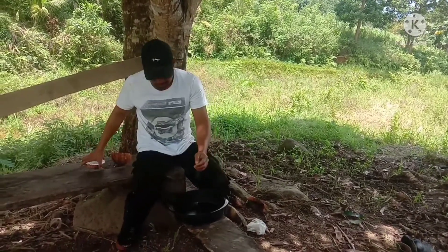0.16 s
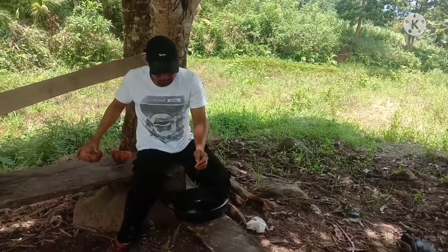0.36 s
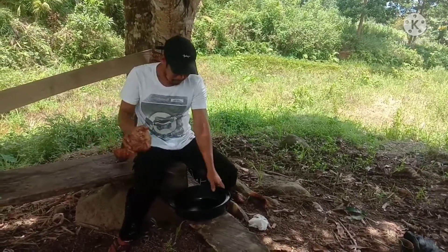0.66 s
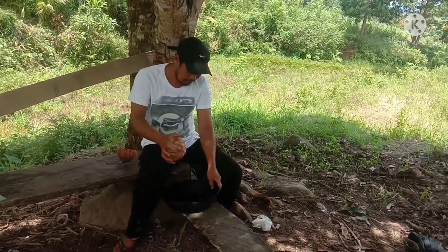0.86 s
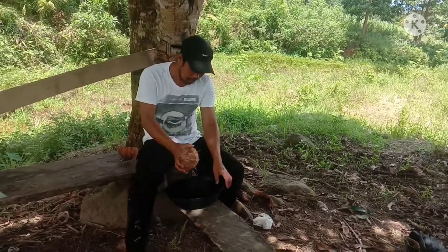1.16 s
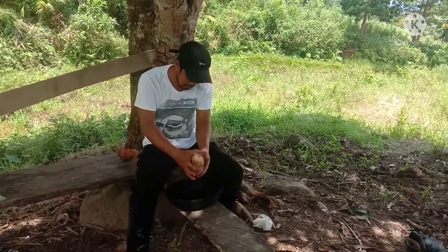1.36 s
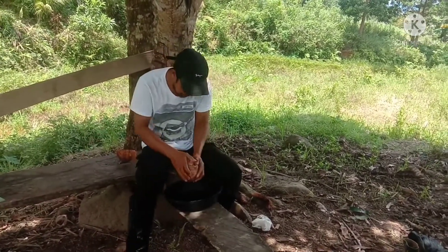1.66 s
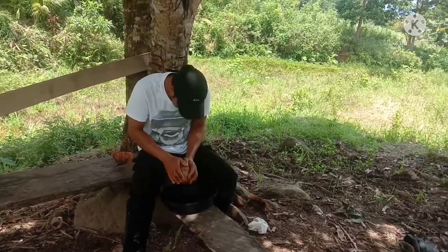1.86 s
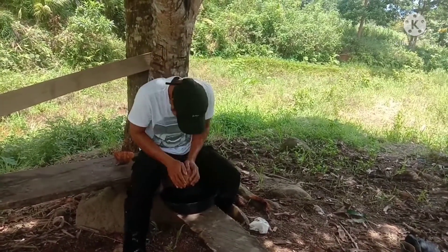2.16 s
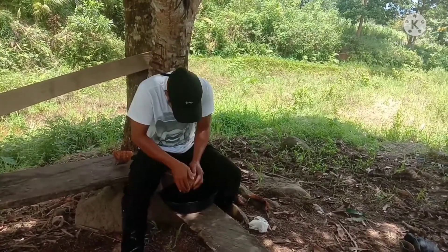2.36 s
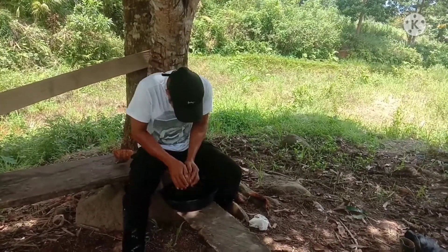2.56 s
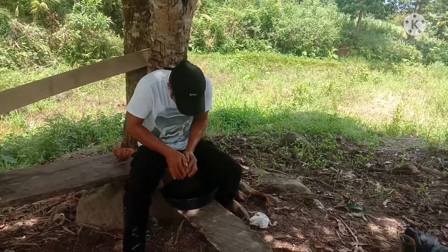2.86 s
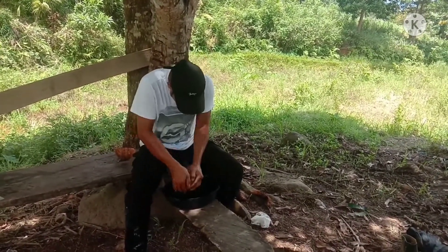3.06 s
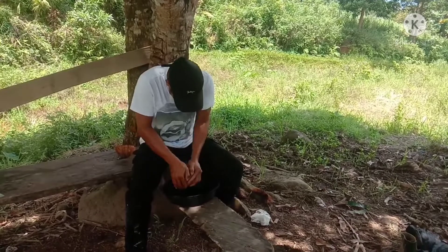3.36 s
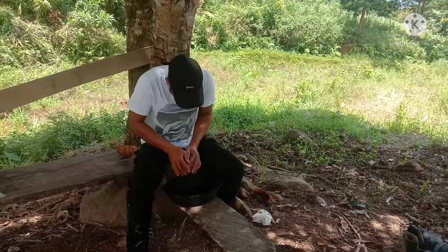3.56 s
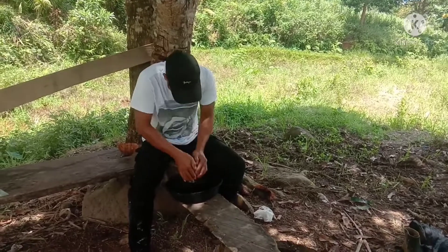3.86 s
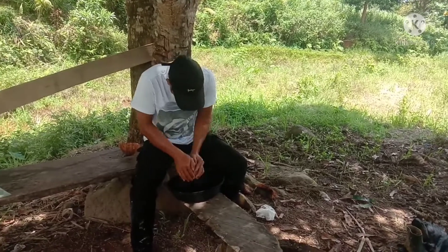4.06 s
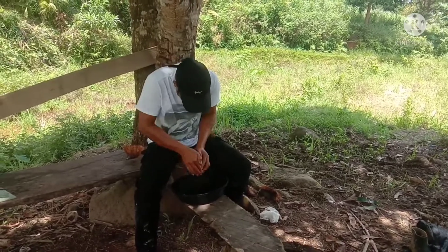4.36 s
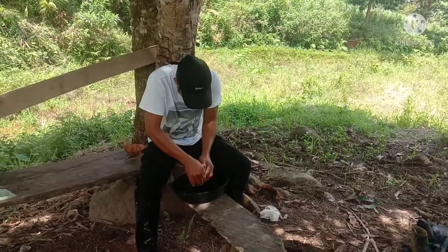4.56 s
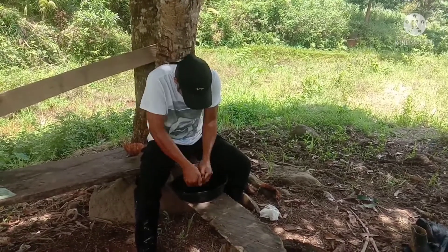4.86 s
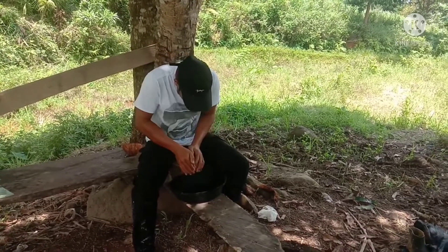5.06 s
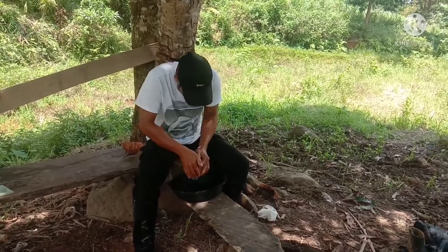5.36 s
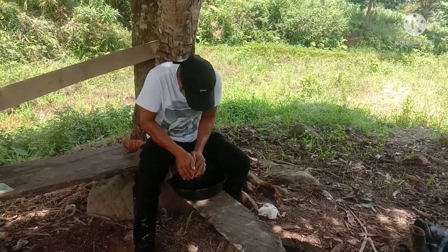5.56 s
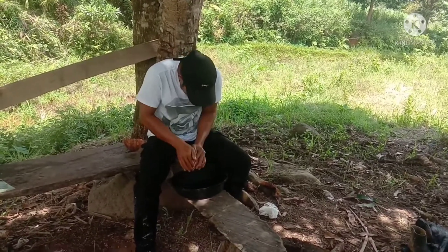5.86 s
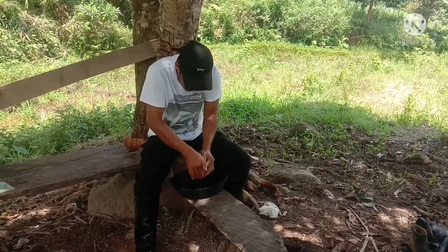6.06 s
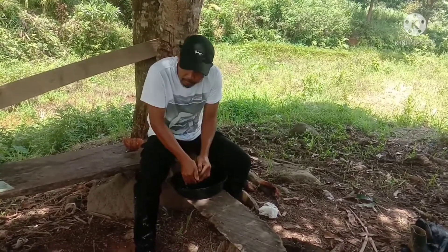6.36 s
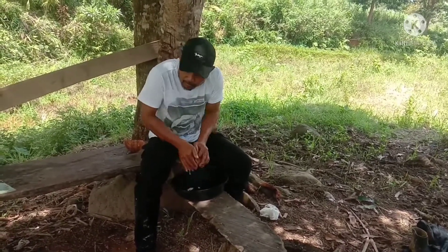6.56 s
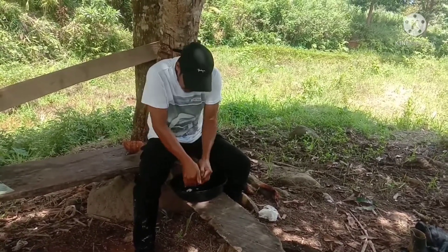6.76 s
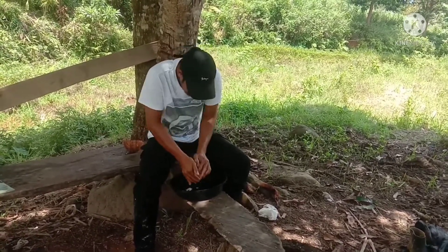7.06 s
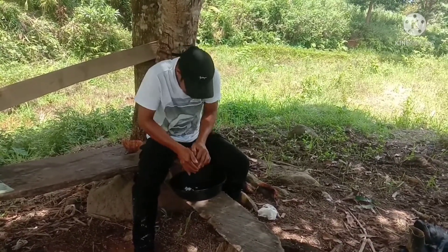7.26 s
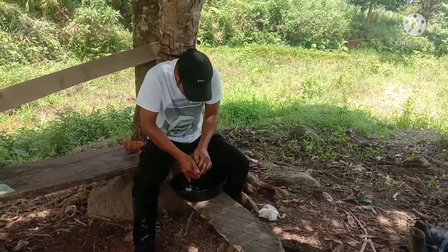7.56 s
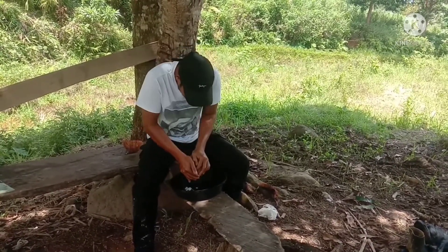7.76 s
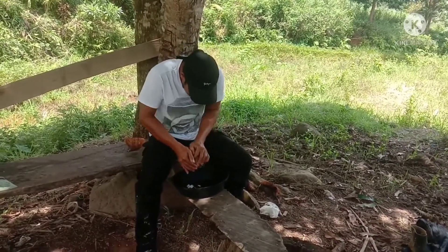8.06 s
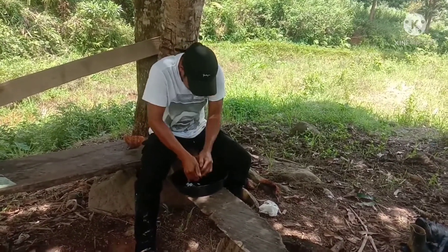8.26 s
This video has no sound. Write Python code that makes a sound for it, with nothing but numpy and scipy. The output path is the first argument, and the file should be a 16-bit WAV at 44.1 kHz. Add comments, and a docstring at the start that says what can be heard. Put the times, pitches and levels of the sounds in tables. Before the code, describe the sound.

Light hollow knocks and a faint scuff come first, followed by about a second of just insects, breeze and faint bird whistles. Then coarse, crunchy scraping begins and continues to the end: brief gritty strokes with tiny gaps, dull bench thumps and shell clacks mixed in, and a slight steel ring. Open-air setting, dry with a little reflection, thin sound from a small microphone.

```python
"""On a wooden bench under a tree, a coconut half is rasped in quick strokes over a toothed steel blade.
Random clicks, as of teeth catching the flesh, ring the shell, bench and blade and make the rasp.
Short pushes ring the shell and bench again as knocks when the shell lands or bumps.
Cicadas drone as coloured clicks in several bands, far birds whistle as gliding sine tones,
and patchy noise makes the background: a light breeze and faint insect lines."""
import sys
import numpy as np
from scipy import signal
from scipy.fft import rfft, irfft, next_fast_len
from scipy.io import wavfile
from scipy.ndimage import uniform_filter1d

SR = 44100
rng = np.random.default_rng(int(sys.argv[2]) if len(sys.argv) > 2 else 0)


def unload_wav(signal):
    """Save mono or channel-first audio to the path in sys.argv[1] as 16-bit WAV at rate SR, clipped to [-1, 1]."""
    wavfile.write(
        sys.argv[1],
        SR,
        np.round(np.clip(np.atleast_2d(signal).T, -1, 1) * 32767).astype(np.int16),
    )


N = 370881

# ringing tones of the wooden bench: f/Hz, width/Hz (wider dies faster), relative level/dB
BENCH_TONES = [(127, 33, -7.5), (216.3, 41, -0.5), (360.8, 38, 2), (457.6, 30.4, 2.5), (529, 52, 1)]
# ringing tones of the coconut shell: f/Hz, width/Hz, relative level/dB
SHELL_TONES = [(838, 290, -6.5), (1023, 83, -6.5), (1146, 40, -8), (1255, 46, -7), (1438, 99, 0),
               (1628, 113, -2.5), (2090, 170, -9)]
# tone colour of the rasp as the microphone hears it, with its dip at 10-13 kHz and peak near 15.5 kHz:
# f/Hz, relative level per Hz/dB
RASP_COLOUR = [(1060, -73), (1800, -9.5), (2280, -3.5), (2540, -2), (2780, -3.5), (3300, -3), (4320, -7.5),
               (6210, -0.5), (6670, -6), (7440, -3.5), (8140, -17.5), (9840, -29.5), (13000, -33),
               (14800, -25), (15600, -12)]


def undb(db):
    """Turn decibels into a factor to multiply the sound by."""
    return 10 ** (np.asarray(db) / 20)


def unit(x):
    """Scale a sound to an average strength (rms) of 1."""
    return x / np.sqrt(np.mean(x ** 2))


def along(s, values):
    """Join points in time (s) by straight lines, read at every sample."""
    return np.interp(np.arange(N) / SR, s, values)


def colour(x, spectrum):
    """Shape a sound by (Hz, dB) points, with steep slopes outside them, and scale it to rms 1."""
    size = next_fast_len(N)
    hz, db = np.transpose(spectrum)
    log_hz = np.log(np.arange(size // 2 + 1) * SR / size + 1)  # 1 Hz added to avoid log(0)
    below = np.maximum(np.log(hz[0]) - log_hz, 0)
    above = np.maximum(log_hz - np.log(hz[-1]), 0)
    curve_db = np.interp(log_hz, np.log(hz), db) - 60 * (below + above)
    return unit(irfft(rfft(x, size) * undb(curve_db), size)[:N])


def walk(rate):
    """Random wandering: levels held 1 / rate seconds, then smoothed twice; typical spread a little under 1."""
    k = int(SR / rate)
    steps = np.repeat(rng.standard_normal(N // k + 1), k)
    return 1.15 * uniform_filter1d(uniform_filter1d(steps, k), k)[:N]


def ring(x, modes, shift_db=0):
    """Let x strike tones that die away; a moving contact favours now one tone, now another."""
    out = 0
    for k, (hz, width, db) in enumerate(modes):
        r = np.exp(-np.pi * width / SR)  # how much is left after one sample
        w = 2 * np.pi * hz / SR
        strike = x * undb(shift_db * walk(14))
        tone = signal.lfilter([0, np.sin(w)], [1, -2 * r * np.cos(w), r * r], strike)
        # neighbouring tones swing in opposite directions
        out = out + (-1) ** k * undb(db) * np.sqrt(width) * tone
    return out


def clicks(rate, spread_db):
    """Random clicks up and down, about rate per second, a few much larger than the rest; rms 1."""
    when, sign, size = rng.random(N), rng.standard_normal(N), rng.exponential(size=N)
    return unit((when < rate / SR) * np.sign(sign) * undb(spread_db * size))


def grating():
    """Teeth catch and tear: slow catches shake bench and shell, fine tearing rasps on top."""
    # ringing tones of the steel blade: f/Hz, width/Hz, relative level/dB
    blade_tones = [(2054, 33, 4.5), (2350, 220, 3), (3290, 23, -0.5), (4584, 37, -9.5), (5676, 60, 12),
                   (6030, 320, 3), (7360, 117, -20)]
    shell, bench, rasp = np.zeros((3, N))
    for s, *levels in rubs():
        gate = along([s[0] + .004, s[0] + .022, s[-1], s[-1] + .03], [0, 1, 1, 0])
        # the arm speeds up and slows down smoothly, which rounds the top of each stroke
        shell_db, bench_db, rasp_db = [uniform_filter1d(along(s, db), int(0.057 * SR)) for db in levels]
        shell += gate * undb(shell_db)
        bench += gate * undb(bench_db)
        rasp += gate * undb(rasp_db)
    judder = walk(90)  # the grip on the teeth comes and goes
    catches = clicks(700, 2.2) * undb(1.8 * judder)
    tearing = clicks(5000, 2.0) * undb(1.3 * judder)
    # dividing by the strength of steady ringing lets the stroke levels set the loudness
    bench_gain, shell_gain = (np.std(ring(catches, m)) for m in (BENCH_TONES, SHELL_TONES))
    bench_ring = ring(catches * bench, BENCH_TONES, 1.9) / bench_gain
    shell_ring = ring(catches * shell, SHELL_TONES, 3.4) / shell_gain
    # the steel sings on its own tones
    blade_ring = unit(ring(tearing, blade_tones, 2.7))
    blade = colour(tearing, RASP_COLOUR) + undb(-9.0) * blade_ring
    return undb(-0.12) * (bench_ring + shell_ring) + undb(3.0) * rasp * blade


def rubs():
    """Each rub as start, top and end times, with shell, bench and rasp levels that follow the arm's speed."""
    # grating strokes: landing t/s, time to full speed/s, slowing-down time/s, then relative levels:
    # shell ring at full speed/dB, bench ring at landing/dB, rasp at full speed/dB
    strokes = [(2.188, 0.089, 0.091, -31.5, -36.5, -36), (2.572, 0.053, 0.15, -28.5, -39, -34),
               (2.932, 0.085, 0.13, -31, -34.5, -36.5), (3.302, 0.078, 0.11, -28.5, -37.5, -35),
               (3.653, 0.1, 0.11, -30, -30.5, -35), (4.029, 0.094, 0.11, -30.5, -33.5, -34),
               (4.418, 0.058, 0.13, -29, -27, -34.5), (4.782, 0.071, 0.12, -27, -32, -35.5),
               (5.13, 0.094, 0.12, -34.5, -35.5, -36), (5.499, 0.1, 0.12, -32.5, -30.5, -36.5),
               (5.87, 0.11, 0.093, -34.5, -24, -36), (6.278, 0.067, 0.15, -30, -34, -36.5),
               (6.629, 0.13, 0.094, -37.5, -40.5, -38.5), (7.016, 0.075, 0.13, -29, -29.5, -35.5),
               (7.371, 0.09, 0.11, -31.5, -30, -35.5), (7.723, 0.081, 0.11, -29.5, -33, -34.5),
               (8.073, 0.089, 0.12, -33, -33, -34.5)]
    # the shell is picked up, turned or shifted: t/s, fade time/s,
    # then relative levels: shell ring/dB, bench ring/dB, rasp/dB
    handling = [(.72, 0.059, -45.5, -62, -68), (.8, 0.059, -44, -56, -51), (.865, 0.12, -42, -45.5, -47.5),
                (1.124, 0.048, -53.5, -68, -55), (1.922, 0.05, -55, -54.5, -49),
                (8.278, 0.027, -48, -37.5, -42.5)]
    shell_rise_db, rasp_rise_db = 9, 12.5  # gained between landing and full speed
    bench_under_shell_db = 9.5  # at full speed
    shell_fall_db, bench_fall_db, rasp_fall_db = 39, 32, 23  # lost while the arm slows down
    handling_rise_s, handling_rise_db, handling_fall_db = .03, 6, 21
    for s, rise_s, fall_s, shell_db, bench_db, rasp_db in strokes:
        held_db = shell_db - bench_under_shell_db
        yield ([s, s + rise_s, s + rise_s + fall_s],
               [shell_db - shell_rise_db, shell_db, shell_db - shell_fall_db],
               [bench_db, held_db, held_db - bench_fall_db],
               [rasp_db - rasp_rise_db, rasp_db, rasp_db - rasp_fall_db])
    for s, fade_s, *levels in handling:
        yield ([s - handling_rise_s, s, s + fade_s],
               *([db - handling_rise_db, db, db - handling_fall_db] for db in levels))


def knocks():
    """Each bump is a short push into the bench, a sharper one into the shell, and a small crack."""
    # the shell lands, bounces or bumps: t/s, relative level/dB, hardness (extra for shell and crack)/dB
    bumps = [(0.681, -47, 10.5), (0.718, -42.5, 15), (0.775, -27, 6), (0.834, -23, 8), (1.046, -56, 14),
             (1.104, -27, -7.5), (2.189, -34, 3.5), (2.209, -41, -19), (2.574, -25, 7.5), (2.61, -22, -16),
             (2.696, -11.5, -13.5), (2.934, -15.5, 0), (3.019, -24, -10), (3.303, -31, 2.5),
             (3.347, -19, -20), (3.655, -13, 1), (3.676, -18.5, 3), (3.595, -43, -7), (3.974, -37, -8),
             (4.029, -21.5, 3.5), (4.049, -10, -3), (4.095, -23, -8), (4.421, -13, -10), (4.441, -22, -20),
             (4.786, -15, -1), (4.809, -14.5, -4), (4.839, -20, -2), (4.874, -33, -3), (4.908, -13.5, -28),
             (5.071, -38, -13), (5.132, -19.5, -1.5), (5.268, -11.5, -10.5), (5.512, -23, -25),
             (5.871, -14, -5.5), (6.22, -46.5, 9), (6.265, -30, 5), (6.282, -14, -2.5), (6.3, -15, -11),
             (6.315, -19.5, -6), (6.63, -20, -2.5), (6.649, -27, -2), (6.667, -20, -1.5),
             (6.741, -25.5, 3.5), (7.016, -22.5, -3), (7.024, -26, 0), (7.371, -25, 5.5),
             (7.725, -18.5, -3), (8.075, -12, -6), (8.091, -15, -2), (8.212, -14, -7.5), (8.258, -26, -2),
             (8.272, -26, -4), (8.33, -49, 9)]
    soft, hard = np.zeros((2, N))
    for s, db, hard_db in bumps:
        i = int((s + .003) * SR)  # the blow comes 3 ms after the listed time
        soft[i] += undb(db)
        hard[i] += undb(db + hard_db)
    push = signal.windows.hann(int(0.0014 * SR))
    tap = signal.windows.hann(int(.0004 * SR))
    crack_fade = signal.lfilter([1], [1, -np.exp(-1 / (0.0041 * SR))], hard)
    crack_colour = [p for p in RASP_COLOUR if p[0] < 9000]
    crack = crack_fade * colour(rng.standard_normal(N), crack_colour)
    bench = ring(np.convolve(soft, push / push.sum())[:N], BENCH_TONES, 1.4)
    # the hairy shell meets several teeth within a few milliseconds
    chatter_shape = np.convolve(hard, signal.windows.hann(int(0.0051 * SR)))[:N]
    chatter = chatter_shape * clicks(2500, .8)
    blows = undb(-5.5) * hard + undb(-27.0) * chatter
    shell = ring(np.convolve(blows, tap / tap.sum())[:N], SHELL_TONES, 1.8)
    return undb(-31) * bench + undb(-23.5) * shell + undb(-18) * crack


def cicadas():
    """Many drum-like skins click out of step; each chorus flutters on its own, near singers swell later."""
    # loudness over time: t/s, then relative levels: low chorus/dB, high chorus/dB, near singers/dB
    chorus = [(0.0, -48, -58.5, -56), (0.65, -48, -58, -52.5), (1.4, -48.5, -59.5, -55),
              (2.9, -47.5, -57.5, -53), (3.49, -46, -56, -44.5), (5.29, -47.5, -57, -43.5),
              (6.39, -46.5, -56.5, -44.5), (7.45, -49, -58.5, -46.5), (8.41, -48.5, -58, -51.5)]
    # tone colour of the low chorus: f/Hz, relative level per Hz/dB
    low_colour = [(2900, -44), (3090, -1), (3490, 3), (4000, 6.5), (4400, -2), (4770, -34)]
    # tone colour of the high chorus: f/Hz, relative level per Hz/dB
    high_colour = [(4700, 1), (4900, -10), (5290, 4), (5500, 1.5), (5780, -5), (6300, -11), (6620, -24.5),
                   (6980, 1.5), (7500, -6.5), (8500, -2.5), (9300, -12.5), (9900, -73)]
    # ringing tones of the near singers: f/Hz, width/Hz, relative level/dB
    singer_tones = [(5826, 160, -2.5), (6080, 44, -5), (6330, 55, -5.5), (7020, 190, -6.5)]
    s, low_db, high_db, near_db = np.transpose(chorus)
    low_level = undb(along(s, low_db) + 0.96 * walk(6) + 0.71 * walk(50))
    low = colour(clicks(1500, 0.37), low_colour) * low_level
    high_level = undb(along(s, high_db) + 1.4 * walk(5.4) + 1.24 * walk(40))
    high = colour(clicks(4000, 0.37), high_colour) * high_level
    near_level = undb(along(s, near_db) + 0.3 * walk(5.1))
    near = unit(ring(clicks(2500, 0.85), singer_tones)) * near_level
    return undb(-2.5) * low + undb(3.0) * high + undb(-4.5) * near


def birds():
    """Far whistles as gliding, fading sine tones, the rough ones wavering in pitch and level."""
    # one whistle a row: start t/s, end t/s, first f/Hz, last f/Hz (both before wavering),
    # relative level/dB, roughness (0 is a clean whistle)
    whistles = [(0.058, 0.135, 2550, 2680, -63, 0.5), (0.248, 0.307, 2020, 1926, -58, 0.5),
                (0.297, 0.485, 2490, 2504, -62, 0.55), (0.493, 0.695, 2656, 2750, -61.5, 0.42),
                (.5, 0.548, 1950, 1990, -58.5, 0.54), (.31, .46, 1840, 1675, -66, 0.84),
                (0.717, .8, 2460, 2420, -64, .36), (1.564, 1.74, 2490, 2275, -63.5, 0.83),
                (2.122, 2.18, 2600, 2500, -67, 0.74), (2.424, 2.556, 2340, 2460, -66, .5),
                (1.061, 1.13, 2050, 2280, -63, 0.72), (1.24, 1.343, 2450, 2640, -59, 0.43),
                (1.315, 1.513, 2670, 2640, -54, 0.24), (1.746, 1.92, 3150, 2950, -51, 0.76),
                (1.79, 1.93, 2380, 2440, -62, 0.68), (1.934, 2.105, 2895, 2860, -61.5, 0.38),
                (4.32, 4.388, 1800, 1870, -58, 0.82), (4.556, 4.657, 2703, 2713, -43, 0),
                (4.696, 4.738, 2497, 2600, -56, .5), (5.33, 5.43, 2683, 2760, -46, 0.2),
                (5.375, 5.527, 2960, 3013, -52.5, 0.49), (5.73, 5.826, 2690, 2540, -60, 0.7),
                (6.128, 6.197, 2670, 2600, -53, 0.4), (6.438, 6.498, 3080, 2910, -57, 0.5),
                (6.493, 6.605, 2893, 2900, -54, .2), (7.93, 8.043, 2810, 2870, -61, 1.2)]
    out, waver, flutter = np.zeros(N), walk(700), walk(45)
    for start, end, first_hz, last_hz, db, rough in whistles:
        i = np.arange(int(start * SR), int(end * SR))
        glide_hz = np.linspace(first_hz, last_hz, len(i))
        hz = glide_hz * (1 + 0.11 * rough ** 2 * waver[i])
        fade_db = np.linspace(0, 7, len(i))
        level = undb(db + 9.4 * rough * flutter[i] - fade_db)
        shape = signal.windows.tukey(len(i), .5) * level
        out[i] += np.sqrt(2) * shape * np.sin(2 * np.pi * np.cumsum(hz) / SR)
    return out


def background():
    """Breeze and faint insect lines as patchy noise: each half octave swells on its own."""
    # tone colour of the background: breeze, faint steady insect lines near 10.8 and 12.3 kHz,
    # and the microphone's top: f/Hz, relative level per Hz/dB
    background_colour = [(25, 14), (60, 7.5), (130, 1), (300, -9), (900, -16.5), (1200, -9), (1270, -1),
                         (1340, -16), (2600, -11.5), (9500, -19), (10200, -37), (10850, -22), (11500, -30),
                         (12300, -25.5), (13300, -33), (15300, -14.5)]
    size = next_fast_len(N)
    hz = np.arange(size // 2 + 1) * SR / size
    half_octave = 2 * np.log2(hz / 25 + 1e-9)  # counted up from 25 Hz
    whole = rfft(colour(rng.standard_normal(N), background_colour), size)
    out = 0
    for k in range(20):
        share = np.clip(1 - np.abs(half_octave - k), 0, 1)  # neighbouring bands overlap
        out = out + irfft(whole * share, size)[:N] * undb(3.5 * walk(9))
    return undb(-60.5) * out


def scene():
    """Grating is near; trunk and ground throw it and the birds back; insects and breeze are all around."""
    near, far = grating() + knocks(), birds()
    t = np.arange(int(.25 * SR)) / SR
    fade = np.exp(-np.log(1000) * t / 0.17)  # the echo drops 60 dB in 0.17 s
    tail = unit(rng.standard_normal(len(t)) * fade) / np.sqrt(len(t))
    echo = signal.fftconvolve(undb(-7.5) * near + undb(2.5) * far, tail)[:N]
    return (near + far + echo + cicadas() + background())[None]


def record(dry):
    """The small microphone loses the deep bass; the recorder cuts the top steeply."""
    bass_hz, top_hz = 95., 15500
    thin = signal.sosfilt(signal.butter(3, bass_hz, "high", fs=SR, output="sos"), dry)
    return signal.sosfilt(signal.ellip(10, .2, 80, top_hz, fs=SR, output="sos"), thin)


dry = scene()
out = record(dry)
unload_wav(out)
```